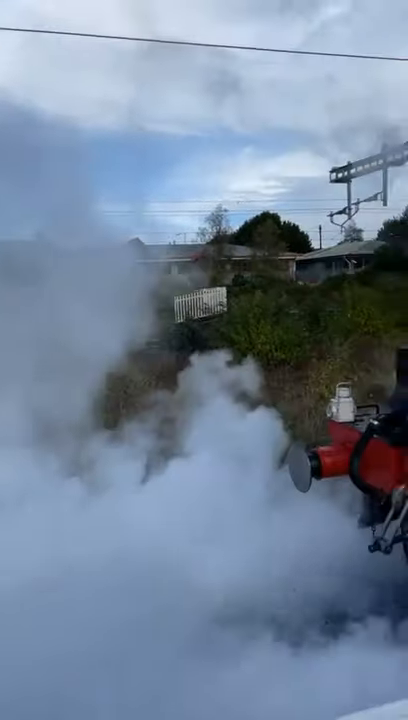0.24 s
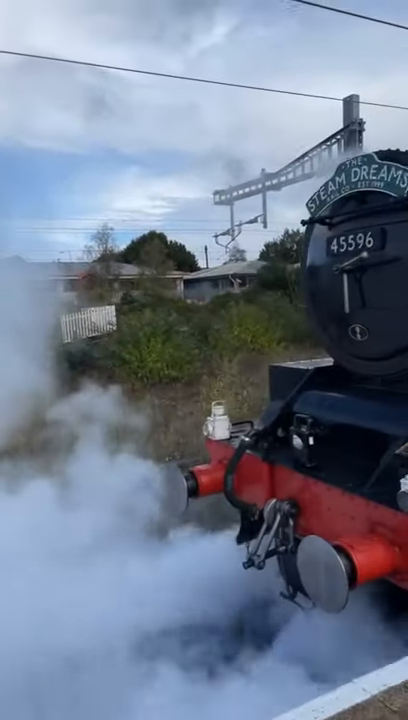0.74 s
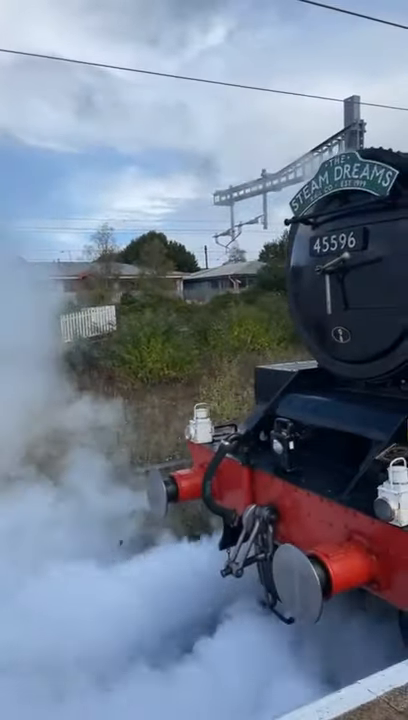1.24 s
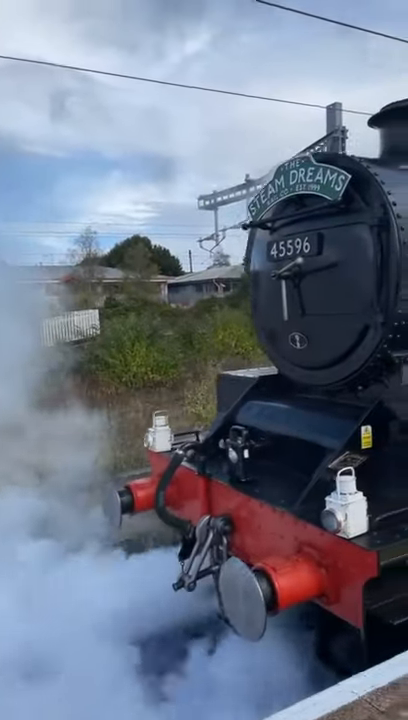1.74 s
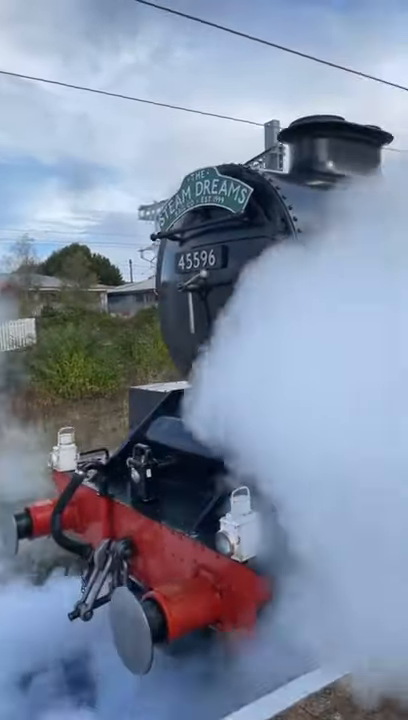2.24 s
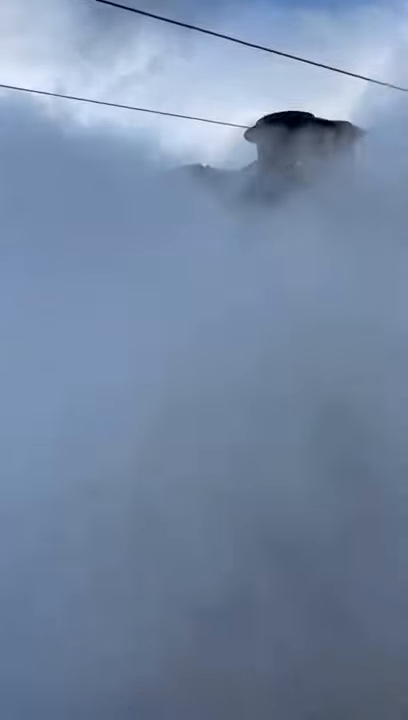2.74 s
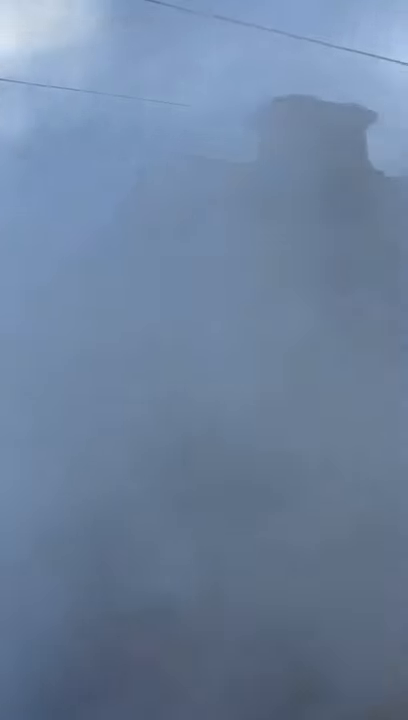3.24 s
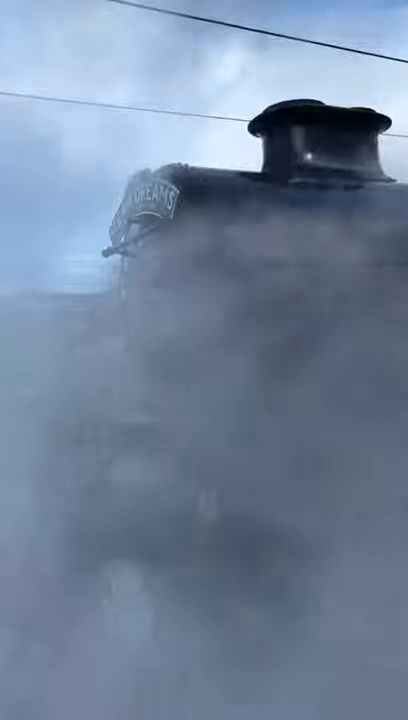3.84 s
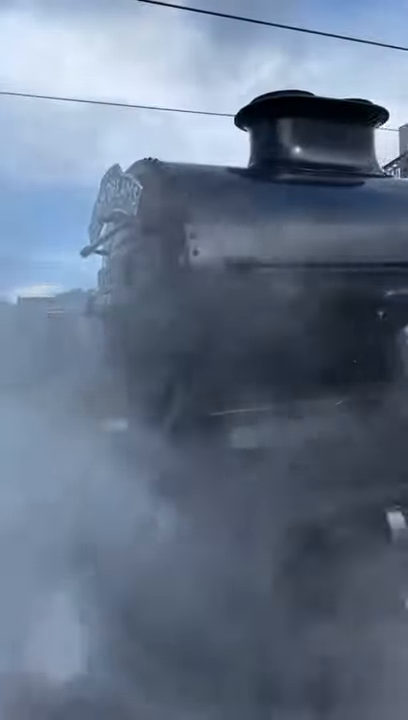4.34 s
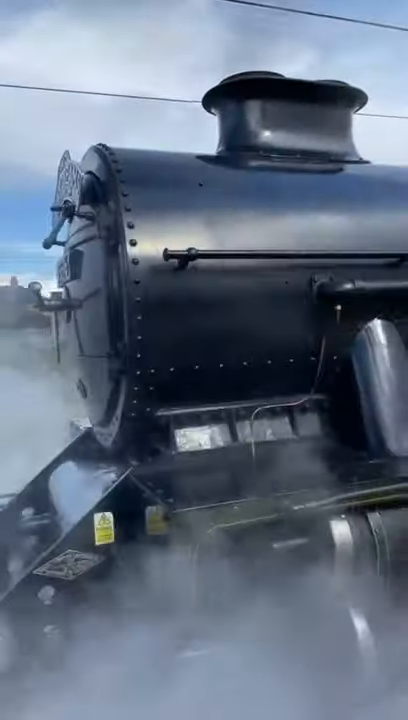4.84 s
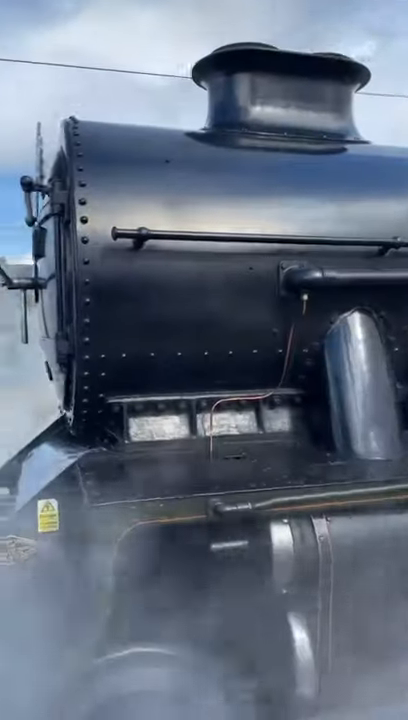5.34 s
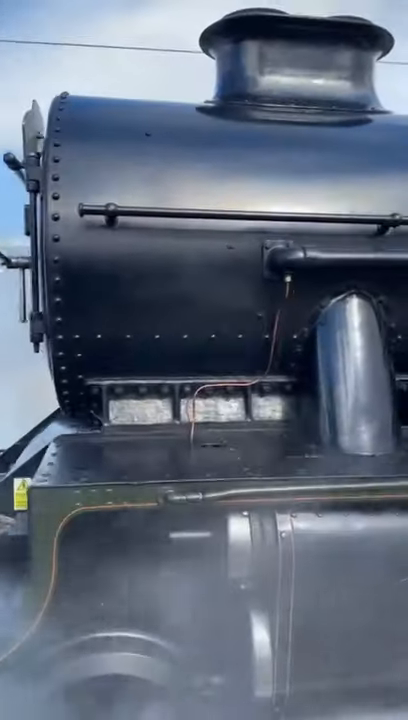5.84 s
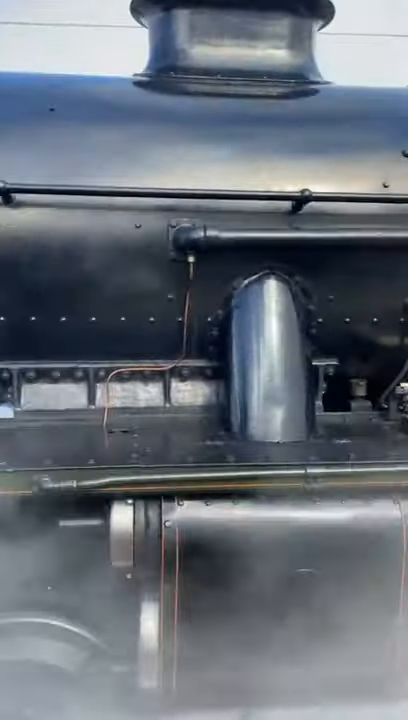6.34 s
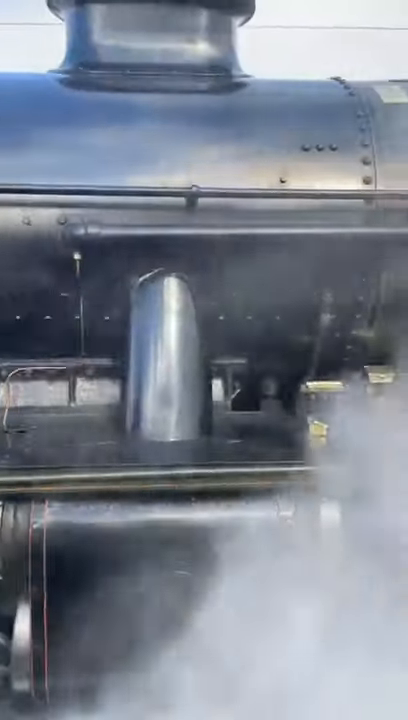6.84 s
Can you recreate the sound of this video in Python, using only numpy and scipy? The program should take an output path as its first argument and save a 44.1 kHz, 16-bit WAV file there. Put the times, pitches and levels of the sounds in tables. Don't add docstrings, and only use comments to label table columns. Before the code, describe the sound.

Steady bright steam hiss beside a locomotive, a sudden harsh overloading blast with a thump, then abrupt drop to a much softer hiss.

```python
import sys
import numpy as np
from scipy import signal
from scipy.fft import rfft, irfft, next_fast_len
from scipy.io import wavfile
from scipy.ndimage import uniform_filter1d, minimum_filter1d

SR = 44100
rng = np.random.default_rng(int(sys.argv[2]) if len(sys.argv) > 2 else 0)


def bounce(signal):
    frames = np.transpose(np.atleast_2d(signal))
    limited = np.clip(frames, -1, 1)
    pcm = np.round(limited * 32767).astype(np.int16)
    wavfile.write(sys.argv[1], SR, pcm)


def convert_level_to_amplitude(level_db):
    exponent = np.asarray(level_db, float) / 20
    return 10 ** exponent


N = 313532

# (low edge [Hz], high edge [Hz])
JET_PARTS = [
    (60, 400),
    (400, 1500),
    (1500, 5000),
    (5000, 12000),
]
FLOW_SHARE = [0.13, 0.79, 0.98, 0.89]
BEAM_SHARE = [0.4, 0.32, 0, 1.]
# (time [s], flow level [dB], aim level [dB])
NEARING_FLOW = [(0.0, -36, -0.5), (0.5, -36, 0.1), (0.9, -34, -0.4), (1.4, -34, 0), (1.58, -34, 2.5),
                (2.1, -34, 0), (2.75, -36, -0.3), (3.1, -38.5, 1), (3.66, -40.3, -0.4)]
# (time [s], flow level [dB], aim level [dB])
BLAST_FLOW = [(3.72, -23, -1), (3.86, -22.5, 0.4), (4.05, -23.5, 0.3), (4.2, -22.5, 0.3), (4.28, -25, 0.1),
              (4.35, -24.5, 1.3)]
# (time [s], flow level [dB], aim level [dB])
PASSING_FLOW = [(4.42, -45.5, 1), (4.55, -44, -0.3), (4.94, -44.6, 0.5), (5.2, -45.5, 0), (5.45, -44, -0.3),
                (6.09, -44.5, -0.5), (6.18, -42, -0.5), (6.55, -41.5, -2), (6.95, -44, -0.5),
                (7.11, -48, 1.5)]
# (frequency [Hz], level [dB per Hz])
NEARING_SPECTRUM = [(43, -42), (86, -22.5), (130, -24.5), (215, -15.5), (300, -18), (440, -21.5),
                    (610, -13.5), (900, -14.5), (1300, -9.5), (2100, -7), (3000, -5.5), (4600, -4),
                    (9900, -0.5), (11500, -1.5)]
# (frequency [Hz], level [dB per Hz])
BLAST_SPECTRUM = [(43, -31), (86, -15), (170, -14.5), (260, -12), (380, -19), (570, -12), (800, -14),
                  (1200, -6.5), (1500, -8.5), (1900, -7.5), (3000, -4), (5000, -2.5), (7700, 0),
                  (11500, -1.5)]
# (frequency [Hz], level [dB per Hz])
PASSING_SPECTRUM = [(43, -34), (86, -18), (130, -20), (215, -13.5), (300, -16), (430, -17.5), (650, -13),
                    (900, -8), (1500, -7), (2300, -4.5), (2900, -0.5), (4000, -0.9), (7700, 0.5),
                    (11500, -0.5)]
# (time [s], delay [ms], share [0-1])
PLATFORM_BOUNCE = [(0, .605, .11), (.8, .62, .14), (1.5, .65, .1), (2.3, .66, .05), (2.45, .53, .03),
                   (2.7, .53, .07), (4.4, .54, .05), (7.11, .5, .02)]
# (time [s], length [s], frequency [Hz], bandwidth [Hz], level [dB])
PIPE_MOANS = [(2.29, 0.22, 638, 50, -52), (2.56, 0.19, 3120, 130, -42), (3.13, 0.2, 3750, 120, -44.5),
              (3.39, 0.12, 186, 23, -55), (4.499, .45, 2990, 360, -62), (4.961, 0.22, 2950, 500, -56),
              (5.9, 0.084, 320, 8, -62.5), (5.9, .16, 474, 8, -65.5), (5.93, 0.18, 175.6, 60, -64),
              (6.11, .12, 2670, 180, -52), (7.02, 0.1, 175, 18, -66), (0.0, .75, 1600, 150, -49.5),
              (2.3, .5, 2150, 130, -51), (2.701, .3, 4700, 900, -43), (3.15, .4, 6600, 860, -39.5),
              (5.301, .25, 1750, 80, -62), (6.0, .3, 1650, 80, -59), (6.6, .5, 1650, 81, -58),
              (6.599, .3, 3200, 400, -54)]
# (time [s], level [dB], top frequency [Hz])
MEMBRANE_POPS = [
    (3.6806, -1.5, 720),
    (3.6962, -21, 280),
    (3.7702, -17, 190),
    (3.9995, -15, 380),
    (4.0346, -22, 330),
    (4.3591, -13.5, 620),
]
# (time [s], level [dB])
GAIN_HOLD = [
    (4.935, -9),
    (5.015, -.1),
]
BAND_SPLITS = [49, 136, 380, 1060]
# (frequency [Hz], level [dB])
BAND_EDGE = [(11500, -0.04), (11700, -3), (11850, -7.5), (12000, -10), (12100, -12), (12250, -15),
             (12350, -70.5)]

BLAST_ON_S, BLAST_OFF_S = 3.6793, 4.3554
OVERSHOOT_DB, BITE_S = 9, 0.018
DREGS_DB, DREGS_S, DREGS_DB_PER_S = -10.5, 0.0066, -900
MOAN_RISE = 0.031
VENT_HZ = 69
SPLIT_DAMPING = 1.06
LIMITER_CEILING = .86
FRAME_SHIFT = 169


def evened(x):
    return x / np.sqrt(np.mean(x ** 2) + 1e-20)


def read(points, hz):
    f, value = np.transpose(points)
    return np.interp(np.log(hz + 1), np.log(f + 1), value)


def add(mix, s, sound):
    part = mix[round(s * SR):][:len(sound)]
    part += sound[:len(part)]


def echoes(hz, t, share):
    s, delay_ms, back = np.transpose(PLATFORM_BOUNCE)
    back = np.clip(np.interp(t, s, back), 0, 1)
    bounce_s = np.interp(t, s, delay_ms) / 1000
    path = 1 - back * np.exp(-2j * np.pi * np.outer(hz, bounce_s))
    column = hz[:, None]
    dull = share / (1 + (column / 5400.0) ** 2)
    dull = dull / (1 + (900 / (column + 1)) ** 4)
    for start, drift, sign in rng.random((6, 3)):
        rolling = 1 + 0.4 * (drift - .5) * (t - t[0])
        delay = (1.5 + 5.5 * start) * rolling / 1000
        path += dull * np.sign(sign - .5) * np.exp(-2j * np.pi * np.outer(hz, delay))
    return path / np.sqrt(1 + back ** 2 + 6 * dull ** 2)


def jet(start, end, rows, colour, patchy_db, flicker_db, echo_share):
    frames = round((end - start) * SR) // 256 + 5
    hz = np.fft.rfftfreq(1024, 1 / SR)
    t = start + np.arange(frames) * 256 / SR
    a, b, patches = rng.standard_normal((frames, 513, 3)).T
    noise = a + 1j * b
    patches = uniform_filter1d(patches, size=14, axis=0)
    patches = evened(uniform_filter1d(patches, size=12, axis=1))
    sputter = evened(uniform_filter1d(rng.standard_normal(frames), size=5))

    s, flow_db, aim_db = np.transpose(rows)
    mean_flow_db = flow_db.mean()
    colour_db = read(colour, hz) - 40 * (hz == 0)
    rush_low, rush_high = JET_PARTS[2]
    rush = (hz >= rush_low) & (hz < rush_high)
    rush_db = 10 * np.log10(np.sum(convert_level_to_amplitude(colour_db[rush]) ** 2))
    colour_db += mean_flow_db - rush_db

    field_db = colour_db[:, None] + patchy_db * patches + flicker_db * sputter
    centres = [np.sqrt(low * high) for low, high in JET_PARTS]
    follow = read(list(zip(centres, FLOW_SHARE)), hz)
    beaming = read(list(zip(centres, BEAM_SHARE)), hz)
    field_db += np.outer(follow, np.interp(t, s, flow_db - mean_flow_db))
    field_db += np.outer(beaming, np.interp(t, s, aim_db))

    plain = signal.istft(noise, nperseg=1024, noverlap=768)[1]
    unit = np.sqrt(np.mean(plain ** 2) / 513)
    z = noise * convert_level_to_amplitude(field_db) * echoes(hz, t, echo_share)
    out = np.zeros(N)
    add(out, start, signal.istft(z, nperseg=1024, noverlap=768)[1] / unit)
    return out


def moans():
    out = np.zeros(N)
    for s, length, hz, width, db in PIPE_MOANS:
        size = round(length * SR)
        chance = rng.standard_normal((SR, 2)) @ [1, 1j]
        waver = signal.lfilter([1], [1, -np.exp(-np.pi * width / SR)], chance)
        steady = min(1, 11.0 / width)
        waver = steady + (1 - 0.56 * steady) * waver[-size:] / np.std(waver)
        glide_hz = hz * (1 + MOAN_RISE * np.linspace(-.5, .5, size))
        turns = np.cumsum(glide_hz) / SR
        tone = (waver * np.exp(2j * np.pi * turns)).real
        swell = signal.windows.tukey(size, .6)
        add(out, s, convert_level_to_amplitude(db) * np.sqrt(2) * tone * swell)
    return out


def pops():
    out, t = np.zeros(N), np.arange(1500) / SR
    for s, db, top_hz in MEMBRANE_POPS:
        u = 2 * np.pi * top_hz * t
        push = (np.e * u / 3) ** 3 * np.exp(-u)
        add(out, s, -convert_level_to_amplitude(db) * push)
    vent = signal.butter(2, VENT_HZ, "high", fs=SR, output="sos")
    return signal.sosfilt(vent, signal.sosfilt(vent, out))


def scene():
    t = np.arange(N) / SR
    since_on = np.maximum(t - BLAST_ON_S, 0)
    since_off = t - BLAST_OFF_S
    before = t < BLAST_ON_S
    after = (since_off > 0) * convert_level_to_amplitude(np.interp(t, *np.transpose(GAIN_HOLD)))

    overshoot_db = OVERSHOOT_DB * np.exp(-since_on / BITE_S)
    dregs_db = DREGS_DB + DREGS_DB_PER_S * np.maximum(since_off, 0)
    blast = convert_level_to_amplitude(np.where(since_off < 0, overshoot_db, dregs_db))
    blast = blast * (since_on > 0) * (since_off < DREGS_S)

    lead = 1024 / SR
    steam = before * jet(0, BLAST_ON_S, NEARING_FLOW, NEARING_SPECTRUM, 0.79, 0.3, 0.11)
    steam += blast * jet(BLAST_ON_S - lead, BLAST_OFF_S + DREGS_S, BLAST_FLOW, BLAST_SPECTRUM,
                         1.0, 0.43, 0.029)
    steam += after * jet(BLAST_OFF_S - lead, N / SR, PASSING_FLOW, PASSING_SPECTRUM, 1.22, 0.43, 0.15)
    return (steam + moans() + pops())[None]


def ragged_top(x, drop_db):
    edge_hz = BAND_EDGE[0][0]
    padded = np.pad(x, ((0, 0), (FRAME_SHIFT, 0)))
    hz, t, z = signal.stft(padded, SR, "cosine", nperseg=2048, noverlap=1024)
    below_edge = (hz > 10500) & (hz < edge_hz)
    level = np.sqrt(np.mean(abs(z[:, below_edge]) ** 2, 1, keepdims=True))
    strong = (abs(z) > convert_level_to_amplitude(drop_db) * level) | (hz < edge_hz)[:, None]
    kept = uniform_filter1d(1. * strong, size=3, axis=1) > 0
    out = signal.istft(z * kept, SR, "cosine", nperseg=2048, noverlap=1024)[1]
    return out[:, FRAME_SHIFT:FRAME_SHIFT + N]


def low_pass(x):
    return signal.sosfilt(signal.butter(12, 12780, fs=SR, output="sos"), x)


def record(dry):
    size = next_fast_len(N + SR // 2)
    hz = np.fft.rfftfreq(size, 1 / SR)
    low_cut = 1 / np.sqrt(1 + (55 / (hz + 1)) ** 4)
    path = convert_level_to_amplitude(read(BAND_EDGE, hz)) * low_cut + 0j
    for split in BAND_SPLITS:
        s = 1j * hz / split
        path *= (s * s - SPLIT_DAMPING * s + 1) / (s * s + SPLIT_DAMPING * s + 1)
    x = irfft(rfft(dry, size) * path, size)[:, :N]
    gain = minimum_filter1d(np.minimum(1, LIMITER_CEILING / (abs(x) + 1e-9)), size=129)
    limited = x * uniform_filter1d(gain, size=129)
    mix = ragged_top(limited, -5.5)
    return low_pass(mix)


dry = scene()
out = record(dry)
bounce(out)
```